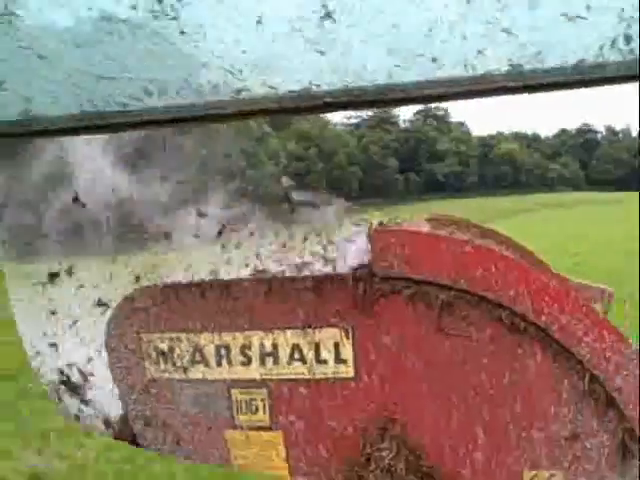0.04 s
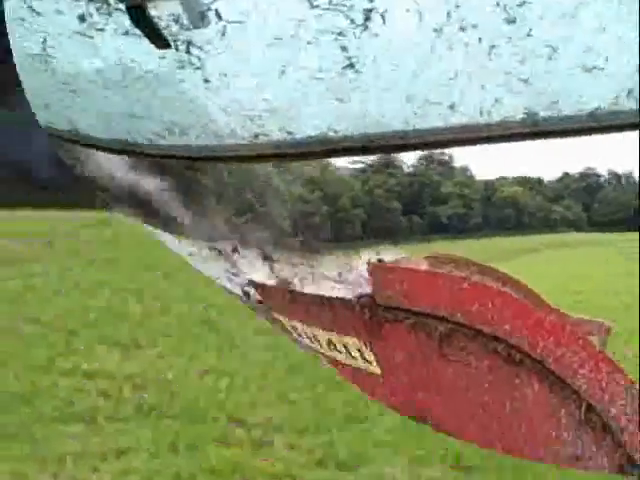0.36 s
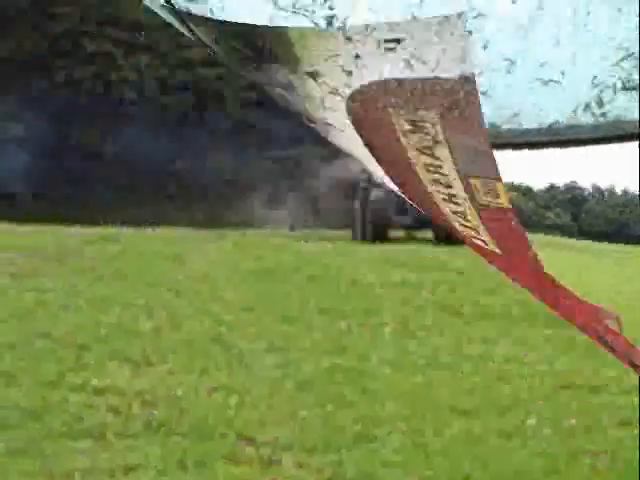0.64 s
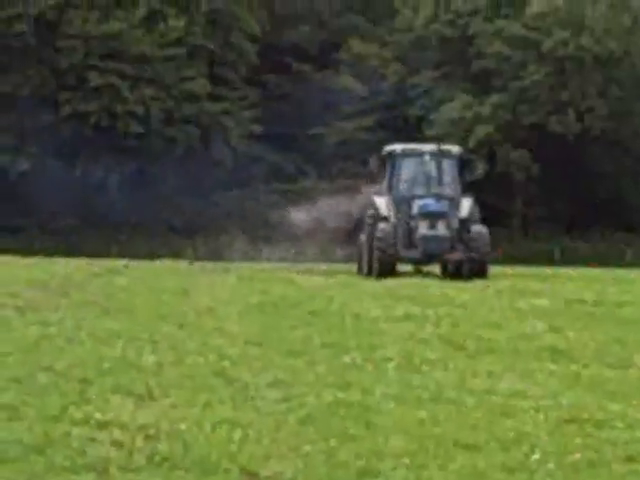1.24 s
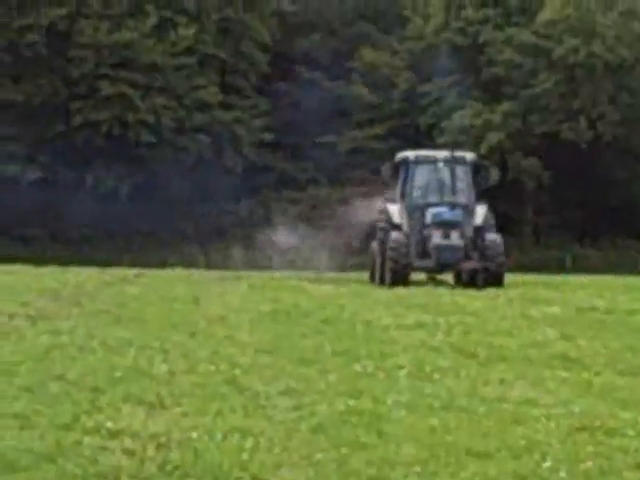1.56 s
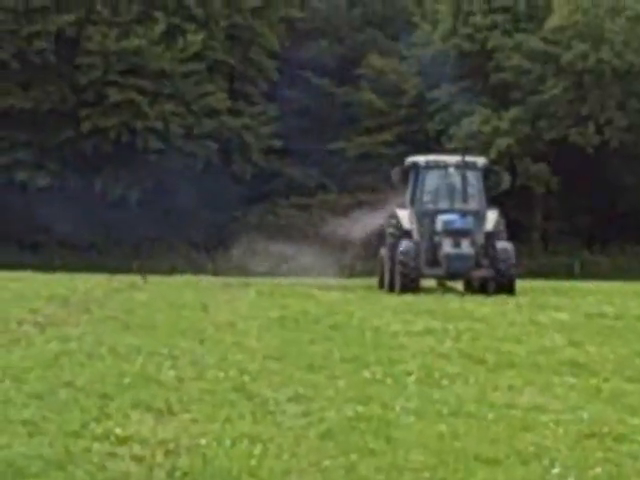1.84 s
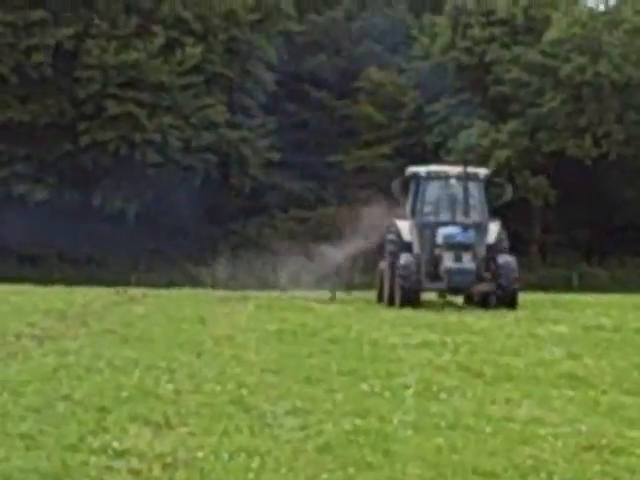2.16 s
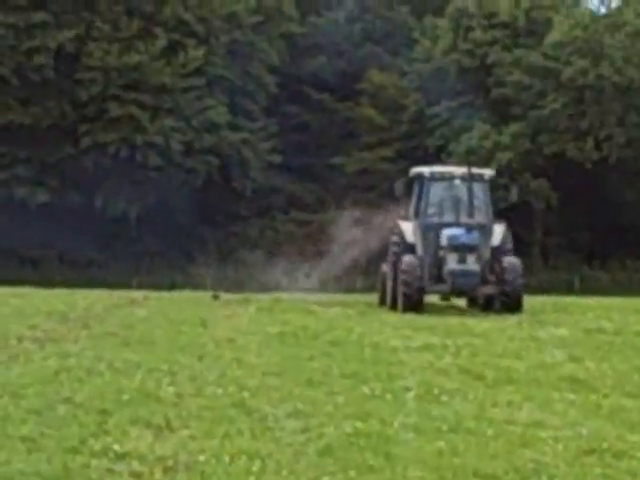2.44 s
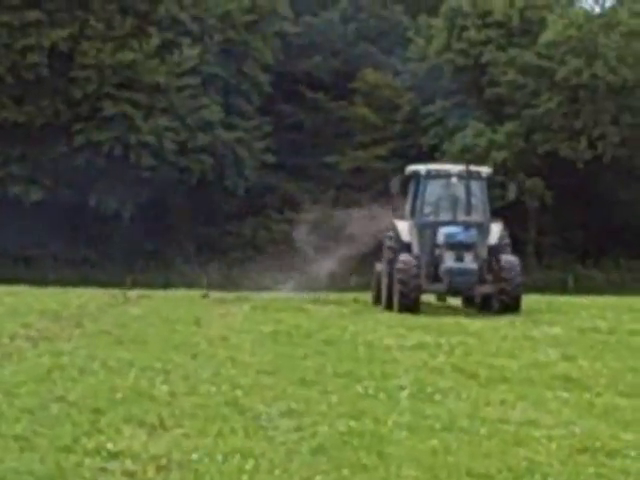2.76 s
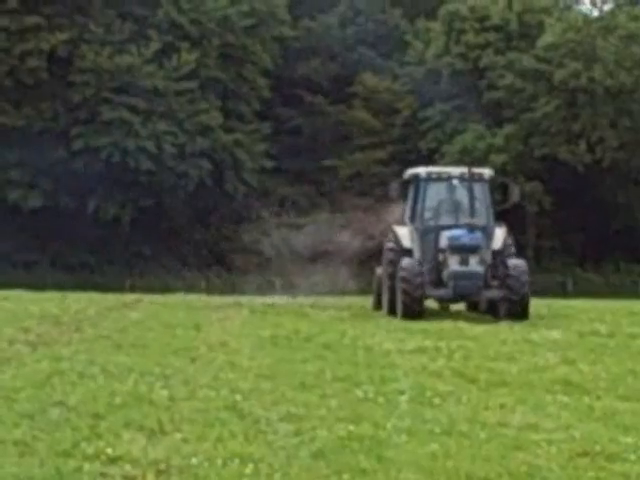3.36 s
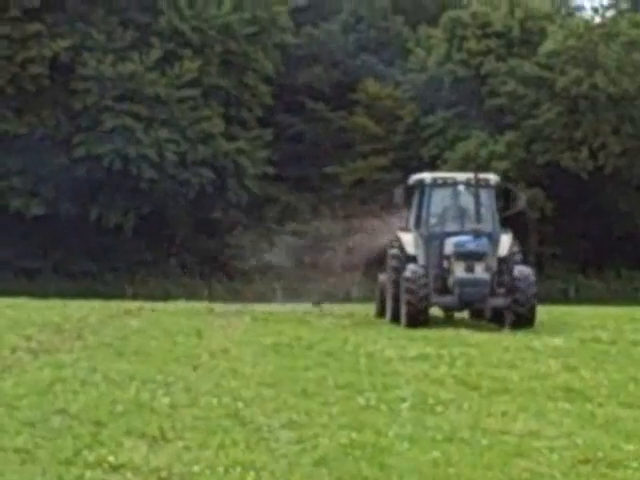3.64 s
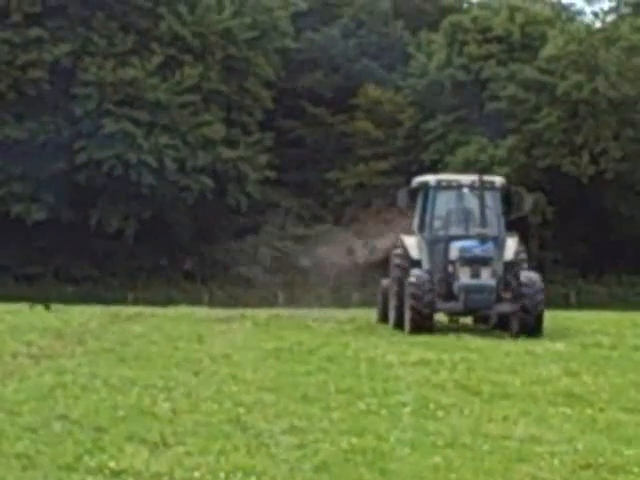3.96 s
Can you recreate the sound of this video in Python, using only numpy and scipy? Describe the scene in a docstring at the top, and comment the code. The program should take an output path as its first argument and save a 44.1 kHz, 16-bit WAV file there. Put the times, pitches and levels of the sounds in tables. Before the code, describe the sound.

Loud muck spreader rattling and clanking close up, fading into a distant tractor's steady drone.

```python
"""Drumming, clanking and a patter of muck come first: a spreader passes at arm's length, its flails
exciting the resonances of its steel barrel and panels while its rotor hums.
As it draws away, a six-cylinder diesel tractor is heard working across the field at a steady speed:
periodic firing makes the block knock and the exhaust hum, and its own flung load hisses.
A little wind buffets the microphone."""
import sys
import numpy as np
from scipy import signal
from scipy.fft import rfft, irfft
from scipy.io import wavfile

SR = 44100
rng = np.random.default_rng(int(sys.argv[2]) if len(sys.argv) > 2 else 0)


def int16_out(signal):
    """Quantize to a 16-bit WAV file."""
    q = np.round(np.clip(np.atleast_2d(signal).T, -1, 1) * 32767)
    wavfile.write(sys.argv[1], SR, q.astype(np.int16))


N = 176400

# speed of the far engine (time [s], firing rate [Hz])
FIRING = [(0, 84.9), (1, 85.2), (3, 85.2), (3.65, 86.5), (4, 85.4)]
# its cylinders in firing order (low knock gain [dB], high knock gain [dB])
CYLINDERS = [(0.5, -1.5), (-1.5, -2.5), (1, -7.5), (-4, -1.5), (0.5, 1.5), (-5, -8)]


def undb(db):
    """Decibels to amplitude ratio."""
    return 10 ** (np.asarray(db) / 20)


def unit(x):
    """Normalisation to an rms of 1."""
    return x / np.sqrt(np.mean(x ** 2))


def noise():
    """Gaussian white noise."""
    return rng.standard_normal(N)


def curve(table):
    """Linear interpolation of each column of a table over time."""
    times, *columns = np.array(table, float).T
    return np.squeeze([np.interp(np.arange(N) / SR, times, c) for c in columns])


def colour(x, points):
    """Spectral shaping by (frequency [Hz], gain [dB]) points, rolling off below the first."""
    hz, db = np.array(points, float).T
    f = np.maximum(np.fft.rfftfreq(N, 1 / SR), 1)
    gain = undb(np.interp(np.log(f), np.log(hz), db))
    return irfft(rfft(x) * gain * np.minimum(f / hz[0], 1) ** 2, N)


def ring(x, modes):
    """Forced response of parallel resonators (frequency [Hz], bandwidth [Hz], gain [dB])."""
    f = np.fft.rfftfreq(N, 1 / SR)
    response = sum(undb(db) * 1j * f * w / (hz ** 2 - f ** 2 + 1j * f * w) for hz, w, db in modes)
    return irfft(rfft(x) * response, N)


def walk(rate):
    """Random fluctuation of rms 1: noise low-passed at about `rate` Hz."""
    f = np.fft.rfftfreq(N, 1 / SR)
    return unit(irfft(rfft(noise()) * np.exp(-(f / rate) ** 2) * (f > 0), N))


def tone(hz, wander_rad, waver_db, rate):
    """A sinusoid of rms 1 under random phase and amplitude modulation."""
    phase = 2 * np.pi * (np.cumsum(hz * np.ones(N)) / SR + rng.random()) + wander_rad * walk(rate)
    return unit(np.sin(phase) * undb(waver_db * walk(rate)))


def wind():
    """Turbulent pressure fluctuations buffet the microphone, most in the spreader's wake."""
    # rumble spectrum (frequency [Hz], gain [dB])
    spectrum = [(10, -10), (26, -2), (37, 1), (48, -4), (70, -6), (110, -18), (300, -61)]
    # gusts (time [s], level [dB])
    level = [(0, -20), (.15, -28), (.6, -27.5), (.78, -40), (1.2, -47), (1.9, -43), (2.4, -51), (2.7, -39),
             (2.9, -51), (3.05, -31), (3.3, -47), (3.45, -46), (4, -48)]
    return unit(colour(noise(), spectrum)) * undb(curve(level))


def far_load():
    """Broadband noise: muck flung behind the far tractor hisses, fluttering slightly."""
    # hiss spectrum (frequency [Hz], gain [dB])
    spectrum = [(2000, -22), (4500, 9), (6500, 7.5), (9800, 4.5), (11400, -3), (12600, 6), (14000, 6),
                (15500, -13.5)]
    # swells of the hiss (time [s], level [dB])
    level = [(0, -46), (1.1, -48), (1.45, -43.5), (1.8, -47), (2.5, -47), (2.9, -43.5), (3.5, -47),
             (4, -47)]
    flutter_db = .8 * walk(25)
    return unit(colour(noise(), spectrum)) * undb(curve(level) + flutter_db)


def sheet_metal():
    """Forced vibration: each firing shakes a loose sheet on the far tractor, which buzzes in fits."""
    # sheet resonance (frequency [Hz], bandwidth [Hz], gain [dB])
    modes = [(3820, 190, 0)]
    # buzz envelope (time [s], level [dB])
    level = [(0, -64), (1.3, -45.5), (1.6, -50), (2.65, -47.5), (2.95, -61)]
    firings = np.cumsum(curve(FIRING)) / SR
    shake = np.exp(-2 * (firings % 1))
    return unit(ring(shake * noise(), modes)) * undb(curve(level) + 2 * walk(6.3))


def gears():
    """Impulse response: timing gears slap at set places in each engine cycle and ring their cover."""
    # slaps (place in the cycle [firings], frequency [Hz], bandwidth [Hz], relative level [dB])
    slaps = [(2.05, 1385, 21, -4), (3.1, 1470, 65, -4), (4.1, 1492, 19, -1.5), (5.45, 1385, 33, -5.5)]
    # envelope of all slaps (time [s], level [dB])
    level = [(0, -63), (1.2, -39.5), (4, -37.5)]
    jitter_firings, scatter_db = .009, 1.5
    firings = np.cumsum(curve(FIRING)) / SR
    out = np.zeros(N)
    for place, hz, width, db in slaps:
        cycle = np.floor((firings - place + jitter_firings * walk(13)) / len(CYLINDERS))
        impulses = np.diff(cycle, prepend=cycle[0]) * undb(scatter_db * noise())
        out += unit(ring(impulses, [(hz, width, 0)])) * undb(db)
    return out * undb(curve(level))


def exhausts():
    """Beating: the tones of both engines interfere in a throbbing drone, over a steady firing tone."""
    # far exhaust harmonics (frequency [multiples of the engine cycle rate])
    orders = (4, 9, 10, 12, 15, 19, 22, 30)
    # strength of each harmonic (level [dB re the drone])
    order_db = [-9, -6.5, -18, -12, -9, -13.5, -10.5, -17.5]
    # hum of the tractor towing the near spreader (frequency [Hz], level [dB re the drone])
    tow_hum = [(134.3, -5), (177, -6.5)]
    # drone of both machines (frequency [Hz], gain [dB])
    spectrum = [(25, -23), (55, -10), (72, -17), (98, -1), (135, 0.5), (185, -0.5), (235, -2.5),
                (290, -11.5), (400, -13), (600, -13), (1200, -38)]
    # swells of the drone (time [s], level [dB])
    level = [(0, -39.5), (1.1, -37.5), (1.5, -34.5), (1.69, -38.5), (2.1, -35), (3.1, -34), (3.45, -35.5),
             (4, -33.5)]
    throb_depth, firing_tone_db = .55, -37.5
    rate = curve(FIRING)
    tones = [(k * rate / len(CYLINDERS), db) for k, db in zip(orders, order_db)] + list(tow_hum)
    waver = lambda hz: tone(hz, wander_rad=.2, waver_db=1.2, rate=9.9)
    hum = sum(waver(hz) * undb(db) for hz, db in tones)
    throb = 1 + throb_depth * np.cos(np.pi * np.cumsum(rate) / SR)  # at half the firing rate
    drone = unit(colour(noise() * throb, spectrum))
    return waver(rate) * undb(firing_tone_db) + (hum + drone) * undb(curve(level))


def diesel():
    """Periodic impact excitation: six unequal cylinders knock on the block and the valve gear ticks."""
    # response of the block (frequency [Hz], gain [dB])
    spectrum = [(250, -12), (420, -0.5), (540, -11.5), (720, -6.5), (900, -1), (1060, 1.5), (1220, -2),
                (1560, -3.5), (1660, -3), (1900, -0.5), (2350, -2.5), (2820, -6.5), (3020, -10),
                (3450, -12.5), (3750, -13.5), (4200, -15), (5000, -15), (6200, -23), (10000, -28),
                (15000, -35.5)]
    # its resonances (frequency [Hz], bandwidth [Hz], gain [dB])
    modes = [(1374, 41, -16), (1530, 92, -4), (2173, 24, -3)]
    # the engine emerges from behind the spreader (time [s], level [dB])
    level = [(0, -34.5), (.55, -36.5), (.8, -31), (1.15, -29.5), (2.35, -30), (3.1, -29), (4, -29)]
    knock_decay_s, scatter_db, split_hz = .0035, .6, 1700
    ticks_per_cycle, tick_decay_s, tick_db, wash_db = 14, .0014, -1, -3.5
    rate = curve(FIRING)
    firings = np.cumsum(rate) / SR
    count = firings.astype(int)
    knock = np.exp(-(firings % 1) / rate / knock_decay_s) * undb(scatter_db * noise()[count])
    low, high = undb(CYLINDERS)[count % len(CYLINDERS)].T
    in_cycle = (firings % len(CYLINDERS) / rate.mean() * SR).astype(int)
    blows = np.zeros(N)
    for band, size in (("low", low), ("high", high)):
        grit = unit(noise() + .41 * noise()[in_cycle])  # partly alike in every cycle
        blows += signal.sosfilt(signal.butter(3, split_hz, band, fs=SR, output="sos"), knock * size * grit)
    per_firing = ticks_per_cycle / len(CYLINDERS)
    tick_age = (firings * per_firing % 1) / (rate * per_firing)
    ticks = undb(tick_db) * np.exp(-tick_age / tick_decay_s) * noise()
    wash = undb(wash_db) * noise()  # stands for diffuse reflection from the wood's edge
    block = colour(blows + ticks + wash, spectrum)
    return unit(block + ring(block, modes)) * undb(curve(level))


def roar():
    """Narrowband noise: a hollow band in the spreader's roar sinks as it goes by."""
    # path of the band (time [s], centre frequency [Hz], level [dB])
    band = [(0, 910, -37), (.3, 809, -35), (.41, 665, -28.5), (.7, 606, -37), (1.1, 591.3, -65)]
    half_width_hz = 64
    hz, db = curve(band)
    phase = 2 * np.pi * np.cumsum(hz) / SR
    return unit(walk(half_width_hz) * np.cos(phase) + walk(half_width_hz) * np.sin(phase)) * undb(db)


def rotor():
    """Rotational harmonics: the spreader's rotor hums and, two octaves up, howls."""
    # the pitch dips as it goes by (time [s], hum frequency [Hz], hum level [dB], howl level [dB])
    passage = [(0, 135.8, -24, -23), (.15, 133.7, -20.5, -24), (.3, 129.2, -24, -29.5),
               (.42, 120.1, -27, -39), (.62, 122, -23.5, -34), (.75, 127.9, -27, -51), (1, 133.2, -45, -72),
               (1.6, 130, -82, -84)]
    hz, hum_db, howl_db = curve(passage)
    hum = tone(hz, wander_rad=.77, waver_db=2, rate=37)
    howl = tone(4 * hz, wander_rad=.55, waver_db=2.5, rate=35)
    return hum * undb(hum_db) + howl * undb(howl_db)


def muck():
    """Shot noise: crumbs strike steel at random, and heavier clods each burst in a short splat."""
    # muck on steel (frequency [Hz], gain [dB])
    spectrum = [(1000, 6), (2500, -6), (4500, -4), (7000, 2.5), (9000, 0), (10700, -3), (13500, 2),
                (15500, 0)]
    crumbs_per_s, flutter_db = 8700, 1.8
    clods_per_s, clod_decay_s, clod_db = 49, .0053, -11.5
    crumbs = (rng.random(N) < crumbs_per_s / SR) * noise()
    crumbs *= undb(np.minimum(rng.exponential(size=N), 3))  # up to 3 dB louder by chance
    clods = (rng.random(N) < clods_per_s / SR) * (1 + rng.random(N))
    splats = signal.lfilter([1], [1, -np.exp(-1 / SR / clod_decay_s)], clods) * noise()
    spray = unit(crumbs * undb(flutter_db * walk(22)))
    return colour(spray + undb(clod_db) * unit(splats), spectrum)


def clanks():
    """Damped free vibration: a chain hits the barrel with a crack, and links and panel ring."""
    # strikes (time [s], link frequency [Hz], ring level [dB], crack level [dB])
    strikes = [(0.116, 2650, -20, -38), (.261, 2930, -22, -28), (0.393, 2645, -24, -23.5),
               (.459, 2920, -32, -40), (.476, 2770, -32, -31)]
    # modes of panel and links (frequency [multiples of the link frequency], relative level [dB])
    modes = [(.47, -6), (.945, -12), (0.999, 0), (1.035, -17), (1.12, -9.5)]
    ring_decay_s, crack_decay_s = .0083, .014
    out = np.zeros(N)
    for start, hz, ring_db, crack_db in strikes:
        age = np.arange(N) / SR - start
        fade = lambda decay: (age > 0) * np.exp(-np.abs(age) / decay)
        partials = sum(undb(db) * np.sin(2 * np.pi * ratio * hz * age) for ratio, db in modes)
        crack = colour(noise(), [(1200, 5), (7500, -2), (15000, -6)])
        out += undb(ring_db) * fade(ring_decay_s) * unit(partials)
        out += undb(crack_db) * fade(crack_decay_s) * unit(crack)
    return out


def spreader():
    """Resonance: uneven flail blows boom in the barrel and shake the panels while muck patters on them."""
    # the spreader draws away (time [s], boom level [dB], rattle level [dB], patter level [dB])
    levels = [(0, -14.5, -20.5, -29), (.13, -22, -21.5, -30), (.26, -21.5, -22, -27.5),
              (.4, -19.5, -25, -33), (.47, -23, -26, -32), (.53, -28, -27.5, -39), (.74, -29, -31, -40.5),
              (.88, -37, -39, -45), (1.1, -41, -47, -69), (1.6, -57, -66, -76)]
    # barrel resonances (frequency [Hz], bandwidth [Hz], gain [dB])
    barrel_modes = [(117.4, 13, 4), (148, 14, 3.5), (164, 37, -1.5), (176, 30, -0.5)]
    # loose chains and panels (frequency [Hz], gain [dB])
    rattle_spectrum = [(100, -20), (220, 1.5), (330, 1.5), (480, 2), (650, 1), (900, -0.5), (1130, -9),
                       (1400, -6), (1900, -8), (2700, -12), (4000, -18), (8000, -31)]
    # their resonances (frequency [Hz], bandwidth [Hz], gain [dB])
    rattle_modes = [(402, 12, -23), (857, 37, -9.5), (1315, 55, 4.5)]
    flail_hz, jitter, scatter_db, decay_s = 43.23, .18, .5, .017
    surge_hz, surge_peak_s, surge_db = 18, .015, 1  # the rattle surges with every turn of the rotor
    boom_db, rattle_db, patter_db = curve(levels)
    strokes = np.cumsum(flail_hz * (1 + jitter * walk(40))) / SR
    size = undb(scatter_db * noise()[strokes.astype(int)])
    blows = np.diff(np.floor(strokes), prepend=0) * size
    shake = size * np.exp(-(strokes % 1) / flail_hz / decay_s) + .66  # never still between blows
    force = unit(blows) + 1.4 * unit(shake * noise())
    boom = ring(colour(force, [(85, -22), (112, 0), (210, -3.5), (420, -16)]), barrel_modes)
    surge = undb(surge_db * np.cos(2 * np.pi * surge_hz * (np.arange(N) / SR - surge_peak_s)))
    rattle = colour(shake * surge * noise(), rattle_spectrum)
    rattle = rattle + ring(rattle, rattle_modes)
    return unit(boom) * undb(boom_db) + unit(rattle) * undb(rattle_db) + unit(muck()) * undb(patter_db)


def scene():
    """Superposition of both machines and the wind in the open field, on one channel."""
    engines = diesel() + gears() + sheet_metal() + exhausts()
    near_spreader = spreader() + rotor() + roar() + clanks()
    return (engines + near_spreader + far_load() + wind())[None]


def record(dry):
    """Band limiting: a steep low-pass filter cuts the top of the treble."""
    cutoff_hz = 15500
    return signal.sosfilt(signal.ellip(10, .2, 80, cutoff_hz, fs=SR, output="sos"), dry)


dry = scene()
out = record(dry)
int16_out(out)
```